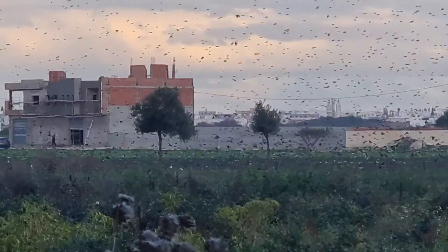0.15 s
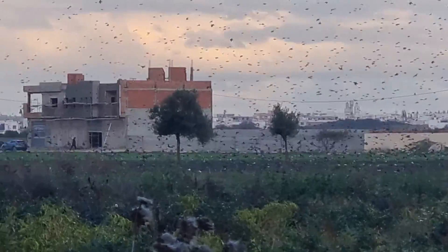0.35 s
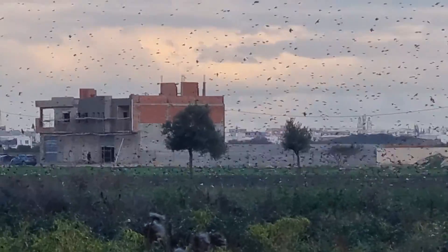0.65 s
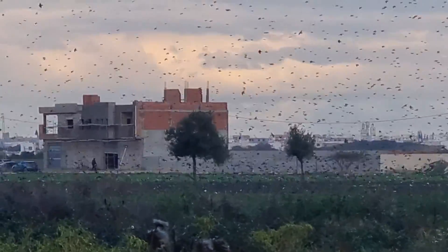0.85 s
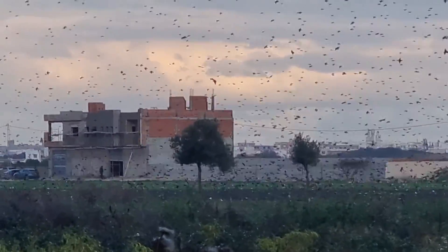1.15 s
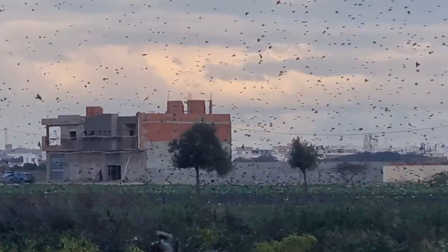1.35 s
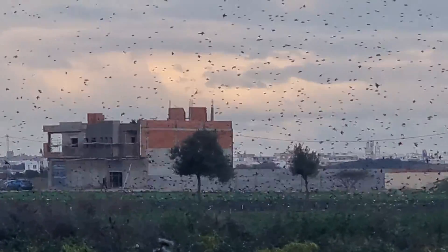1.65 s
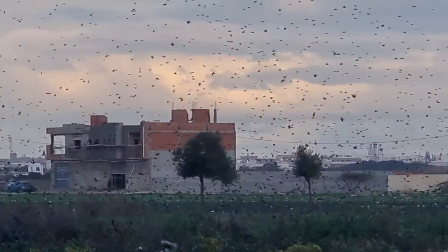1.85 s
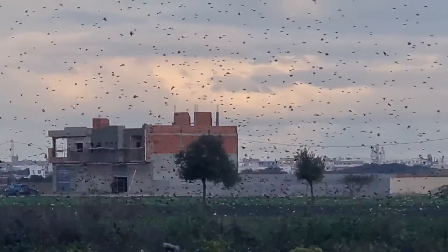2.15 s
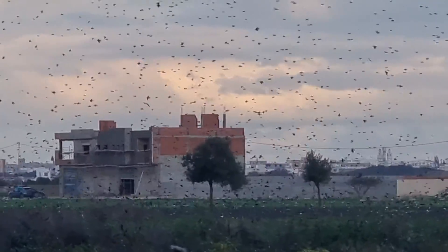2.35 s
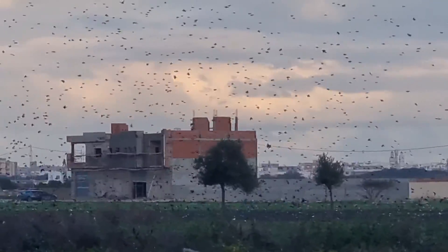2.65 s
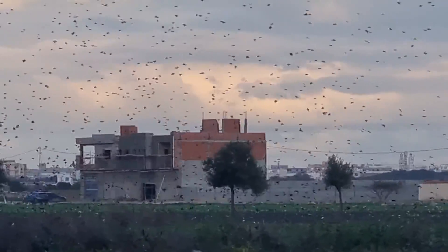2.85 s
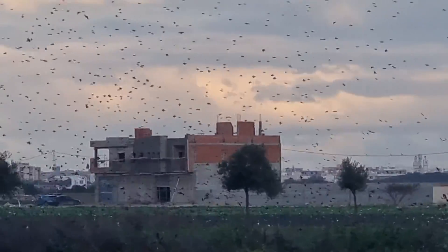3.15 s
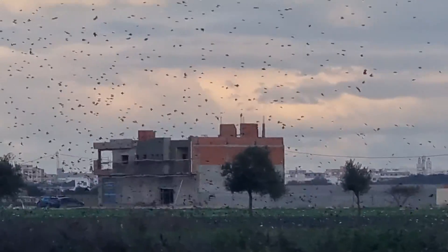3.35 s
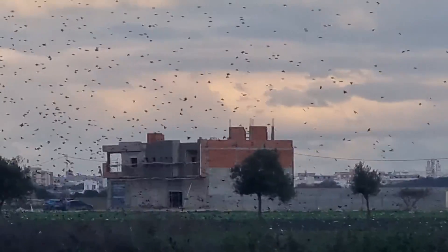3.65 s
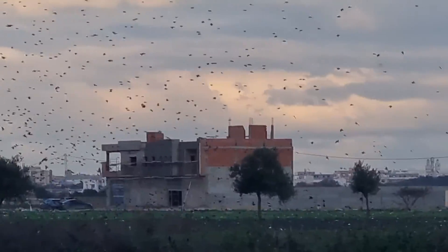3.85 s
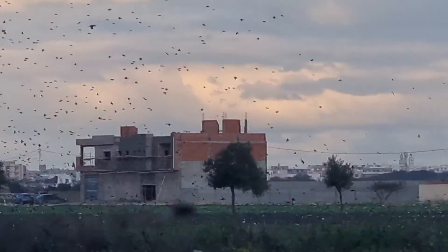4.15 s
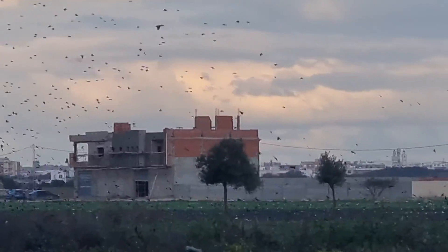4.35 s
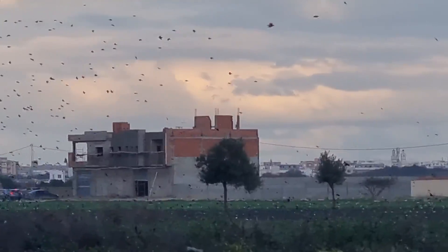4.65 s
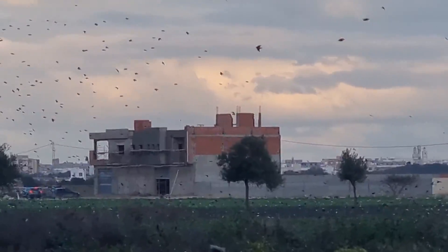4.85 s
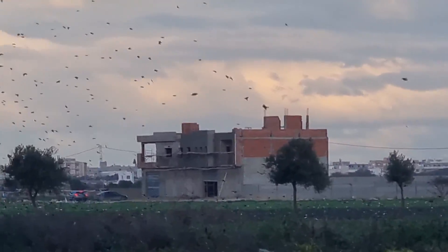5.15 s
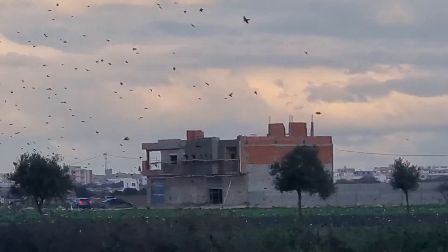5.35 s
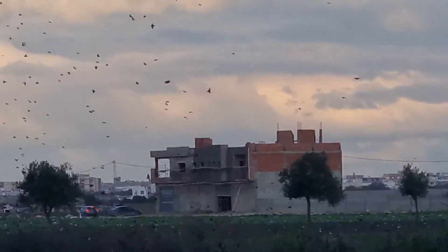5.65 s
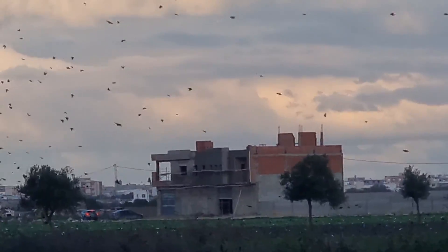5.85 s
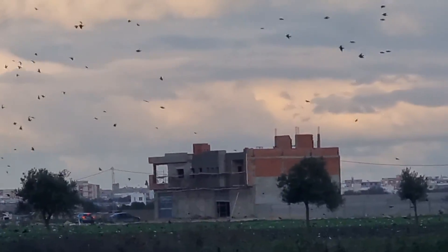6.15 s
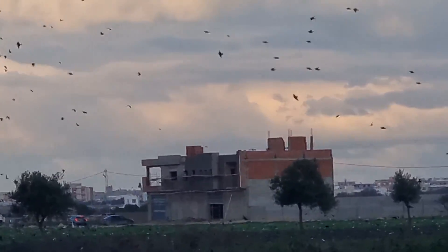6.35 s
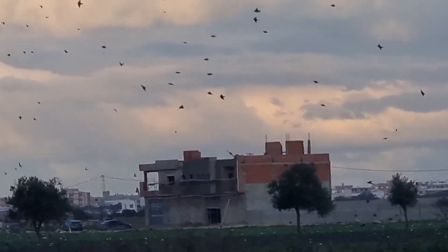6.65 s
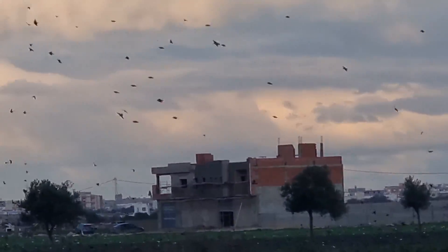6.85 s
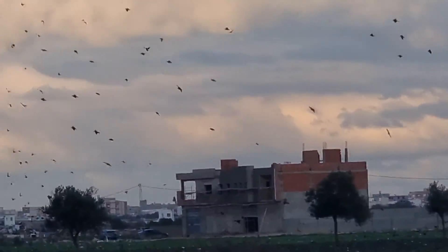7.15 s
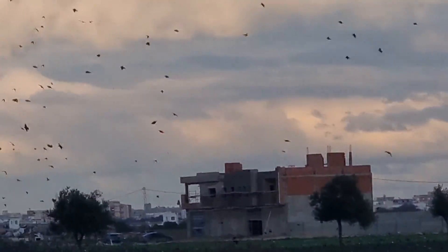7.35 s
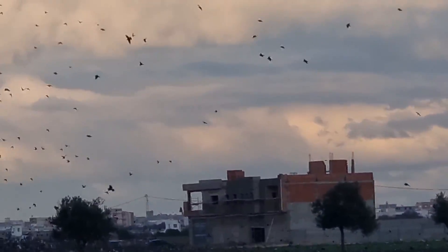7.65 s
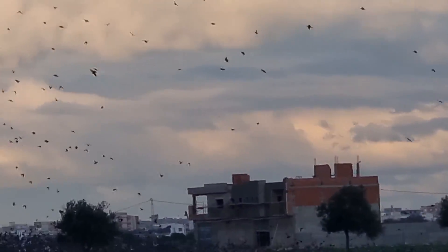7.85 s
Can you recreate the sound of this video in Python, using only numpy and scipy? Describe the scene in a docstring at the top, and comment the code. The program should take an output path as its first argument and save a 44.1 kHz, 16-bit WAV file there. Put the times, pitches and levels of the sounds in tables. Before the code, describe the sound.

Thousands of small birds twitter together across an open field, a few nearer chirps standing out, while far engines drone unevenly underneath.

```python
"""A huge starling flock over an open field: thousands of short falling chirps merge into a steady hiss of
chatter, while nearer calls, some built of several notes in a row, and thin whistles stand out.
Far traffic lies beneath: engines drone and throb as gliding sine notes, tyres swell and fade as bands
of shaped noise. Two spaced microphones hear the scene, with most of the flock to their left."""
import sys
import numpy as np
from scipy import signal
from scipy.fft import rfft, irfft, next_fast_len
from scipy.io import wavfile
from scipy.ndimage import uniform_filter1d, map_coordinates

SR = 44100
rng = np.random.default_rng(int(sys.argv[2]) if len(sys.argv) > 2 else 0)


def master(y):
    """Save y as 16-bit WAV."""
    cut = np.clip(np.atleast_2d(y).T, -1, 1)
    pcm = np.round(cut * 32767)  # scale
    wavfile.write(sys.argv[1], SR, pcm.astype(np.int16))


N = 353108

# loudness of the whole flock over time, before each layer's trim: time_s, level_db
CHATTER_LEVEL = [(0.1, -54.5), (1.36, -53), (2.95, -54.5), (4.92, -55), (5.55, -54.5), (7.9, -54.5)]
PORT_LAG_S = .0005  # sound from the left reaches the right microphone this much later


def amp(db):
    """Decibels to gain."""
    return 10 ** (np.asarray(db) / 20)


def unit(x):
    """Scale to rms 1."""
    return x / np.sqrt(np.mean(x ** 2) + 1e-20)


def along(points, hz):
    """Read (Hz, value) points on a log frequency axis."""
    point_hz, value = np.transpose(points)
    return np.interp(np.log(hz + 1), np.log(point_hz + 1), value)


def curves(rows):
    """One value per sample for each column after the time."""
    time_s, *columns = np.transpose(rows)
    return [np.interp(np.arange(N) / SR, time_s, column) for column in columns]


def bell(center_s, spread_s):
    """A smooth Gaussian hump of height 1 around a time."""
    t = np.arange(N) / SR
    return np.exp(-((t - center_s) / spread_s) ** 2 / 2)


def wobble(rate):
    """A smooth random curve, rate knots a second."""
    knots = rng.standard_normal(int(N * rate / SR) + 4)
    return map_coordinates(knots, [np.arange(N) * rate / SR])


def filtered(x, response):
    """Shape the spectrum of x by a response of frequency."""
    size = next_fast_len(N + SR // 4)
    hz = np.fft.rfftfreq(size, 1 / SR)
    return irfft(rfft(x, size) * response(hz), size)[..., :N]


def add(track, start, sound):
    """Mix a sound into a track from a sample on, cut at the track's ends."""
    lo, hi = max(start, 0), min(start + len(sound), N)
    if hi > lo:
        track[lo:hi] += sound[lo - start:hi - start]


def rush(spectrum, patchy_db, lag_s):
    """Outdoor stereo noise of rms 1 with drifting patches of gain; the right side is lag_s late."""
    # how alike the two ears are: pitch_hz, left_right_likeness (1 = identical)
    likeness = [(60, 0.79), (160, 0.98), (300, 0.77), (480, 0.65), (750, 0.55), (2000, 0.38), (4500, 0.12),
                (6500, 0.071)]
    grains = signal.stft(rng.standard_normal((2, N)), nperseg=1024)[2]
    patches = uniform_filter1d(rng.standard_normal(grains.shape[1:]), 7, 0)  # smooth over frequency
    patches = uniform_filter1d(patches, 16, 1)  # smooth over time
    pair = signal.istft(grains * amp(patchy_db * unit(patches)), nperseg=1024)[1][:, :N]

    def mid_side_response(hz):
        angle = np.arccos(np.clip(along(likeness, hz), -1, 1)) / 2
        return amp(along(spectrum, hz)) * [np.cos(angle), np.sin(angle)]

    mid, side = filtered(pair, mid_side_response)
    left, right = mid + side, mid - side
    return unit(np.array([left, np.roll(right, round(lag_s * SR))]))


def scatter(x, t60):
    """Ground, trees and walls return a short diffuse tail (60 dB down at t60 s), different at each ear."""
    t = np.arange(SR // 2) / SR
    tail = rng.standard_normal((2, len(t))) * amp(-60 * t / t60)
    return signal.fftconvolve(x, tail / np.linalg.norm(tail[0]), axes=1)[:, :N]


def firing_note(low_hz, top_hz, top_s, rev_s):
    """An engine's firing rate as a sine: it rises, eases off, and fades and wavers in the moving air."""
    fade_db, fade_rate, waver_rad = 2, 7, 0.43  # depth and knots a second of fading, phase drift
    hz = low_hz + (top_hz - low_hz) * bell(top_s, rev_s)
    phase = 2 * np.pi * (np.cumsum(hz) / SR + rng.random()) + waver_rad * wobble(9)
    return amp(fade_db * wobble(fade_rate)) * np.sqrt(2) * np.sin(phase)


def engines():
    """Only each engine's firing note carries this far; notes swell in passing and beat together."""
    # deepest engine, level before the drone trim: time_s, level_db
    heavy_level = [(0, -38), (.42, -46), (.65, -39.5), (1.0, -43.5), (1.15, -40.5), (1.55, -43),
                   (1.76, -46), (1.93, -40.5), (2.35, -40.5), (2.55, -43), (3.0, -49), (3.45, -37),
                   (3.85, -42.5), (4.25, -39), (4.62, -37.5), (4.8, -49.5), (5.7, -46), (8.0, -47.5)]
    # its note: low_hz, top_hz, top_s, rev_s (time spread of the rise)
    heavy_note = (50.7, 55.4, 5, 2.6)
    # other engines, before the trim: low_hz, top_hz, top_s, rev_s, nearest_s, half_passing_s, level_db
    far_engines = [ (74.1, 85.7, 5.6, 3.3, 3.5, 4.7, -50), (63, 64.2, 3.13, 1.932, 5, 2.1, -45.5),
                   (64, 72.5, 4.4, 2.9, 0.19, 1.1, -46.5), (72, 74, 4.01, 2.02, 2.6, 2.7, -51.5),
                   (82.6, 86, 7.7, 0.48, 6.8, 0.06, -42.5), (127.5, 151.5, 6.3, 3, 4.6, 2.1, -61)]
    # brief swells and dips of the whole drone: center_s, spread_s, gain_db
    throbs = [(0.005, 0.024, 6), (0.405, 0.024, 8.5), (.65, 0.037, -6), (1.125, 0.018, 4),
              (1.625, .015, 12.5), (1.737, .06, -19), (1.946, 0.019, 9), (2.29, .06, 2),
              (2.612, 0.019, -10), (3.17, 0.019, -10), (3.513, 0.017, 2.5), (4.27, 0.02, 5),
              (4.534, 0.017, 0.5), (4.63, .02, 5), (4.884, 0.016, 6.5), (5.05, .02, -6), (5.113, .018, 5.5),
              (5.627, .02, 5), (5.9, .025, 4.5), (6.2, 0.015, -8), (6.855, 0.027, 8.5)]
    drone_db, gust_db = -1.55, 0.5  # trim of all engines; how far gusts swing them
    t = np.arange(N) / SR
    heavy_db, = curves(heavy_level)
    drone = amp(heavy_db) * firing_note(*heavy_note)
    for *note, nearest_s, half_s, level_db in far_engines:
        distance = np.hypot(1, (t - nearest_s) / half_s)  # 1 when nearest
        drone += amp(level_db) / distance * firing_note(*note)
    throb_db = sum(gain_db * bell(center_s, spread_s) for center_s, spread_s, gain_db in throbs)
    return drone * amp(drone_db + gust_db * wobble(8) + throb_db)


def road():
    """Low traffic rumble and a wash of tyre noise, both shaped random noise."""
    # colour of the rumble: pitch_hz, relative_level_db (per Hz)
    rumble_colour = [(15, -25.5), (23, -26.5), (27, -10), (45, -1.5), (58, 0.5), (85, -2.5), (98, -7.5),
                     (125, -14), (165, -23), (300, -23.5), (500, -26), (1500, -75.5)]
    # colour of the tyre wash: pitch_hz, relative_level_db (per Hz)
    tyre_colour = [(200, -22), (400, -8.5), (480, -4.5), (550, 2.5), (680, -0.5), (880, 2), (1100, -4),
                   (1400, -3), (1700, -10.5), (2000, -4), (2400, -17.5), (4000, -10), (8000, -58.5)]
    # tyre wash before its trim: time_s, level_db
    tyre_level = [(0.1, -55.5), (0.8, -56.5), (2.0, -55), (3.98, -58.5), (4.65, -57.5), (5.1, -55),
                  (5.59, -58), (6.5, -56), (7.9, -54.5)]
    tyre_trim_db = 1
    tyre_db, = curves(tyre_level)
    rumble = amp(-46) * rush(rumble_colour, patchy_db=1.6, lag_s=0)
    wash = amp(tyre_db + tyre_trim_db) * rush(tyre_colour, patchy_db=1.27, lag_s=0)
    return rumble + wash


def passing_tyres():
    """Passing tyres sing in resonant bands of noise, each swelling and fading; one car may give several."""
    # bands of tyre noise from far cars, before the shared trim:
    # nearest_s, spread_s, tyre_pitch_hz, width_hz, level_db
    tyre_bands = [(1.5, 0.22, 1990, 200, -62), (1.45, .25, 1330, 198, -61.5),
                  (2.037, 0.15, 825, 160, -58.5), (2.43, 0.16, 882, 50, -57),
                  (2.056, 0.07, 1130, 130, -55.5), (2.4, 0.2, 362, 90, -60.5),
                  (3.174, 0.14, 1240, 480, -57), (3.56, 0.15, 292, 170, -60), (4.8, 0.3, 280, 170, -62),
                  (7.27, 0.25, 625, 200, -56.5), (7.6, 0.14, 874, 140, -65), (7.6, 0.32, 1420, 348, -64)]
    tread = rush([(100, 0), (3000, 0.002)], patchy_db=-0.5, lag_s=0)  # practically flat noise
    singing = np.zeros((2, N))
    for nearest_s, spread_s, pitch_hz, width_hz, level_db in tyre_bands:
        band = filtered(tread, lambda hz: 1 / (1 + ((hz - pitch_hz) / width_hz * 2) ** 2))
        singing += amp(level_db) * bell(nearest_s, spread_s) * unit(band)
    return amp(-2.0) * singing


def far_hiss():
    """The farthest wings and voices blur into a soft hiss that follows the flock's loudness."""
    # colour of the hiss: pitch_hz, relative_level_db (per Hz)
    hiss_colour = [(150, -9.5), (1000, -1.5), (1700, -0.5), (2000, 0.5), (2400, -3.5), (3000, 0), (4300, 1),
                   (5300, -0.5), (6000, -4.5), (7100, -8), (8400, -18), (9600, -38.5), (11000, -42.5),
                   (12500, -34.5)]
    hiss_trim_db = 2.22  # over the flock's level
    level_db, = curves(CHATTER_LEVEL)
    return amp(level_db + hiss_trim_db) * rush(hiss_colour, patchy_db=0.8, lag_s=PORT_LAG_S)


def chirp(length_s, top_hz, end_hz, rasp):
    """One note of rms 1: the pitch hooks up, falls and levels out, while the syrinx flutters."""
    u = np.linspace(0, 1, int(max(length_s, .01) * SR))  # progress through the note
    rise = u / .21  # 1 at the top of the hook
    hook = (rise * np.exp(1 - rise)) ** 2
    knots = np.linspace(0, 1, 40)
    flutter, tremor = rng.standard_normal((2, len(knots)))  # random pitch and loudness
    glide_hz = end_hz + (top_hz - end_hz) * hook
    hz = glide_hz * np.interp(u, knots, 1 + rasp * flutter)
    envelope = np.abs(np.sin(np.pi * knots ** .78)) ** .8
    swell = np.interp(u, knots, envelope * amp(2.3 * tremor))
    return unit(swell * np.sin(2 * np.pi * np.cumsum(hz) / SR))


def near_birds():
    """Nearer calls that stand out of the mass, some of several falling notes in a row, and thin whistles."""
    # notes of nearer calls, level before the trims: start_s, length_s, top_hz, end_hz, level_db
    near_notes = [ (0.387, .045, 4900, 3750, -52), (0.43, .05, 3500, 3080, -54),
                  (.675, .035, 7300, 5800, -61), (1.09, 0.06, 7780, 5950, -52),
                  (1.14, .062, 5300, 4950, -49.8), (1.183, 0.069, 4150, 3700, -55),
                  (1.228, .07, 7500, 6850, -62), (1.364, 0.046, 7700, 5200, -58),
                  (1.378, .045, 7800, 5500, -58), (1.666, 0.026, 5600, 5360, -54),
                  (1.70, 0.06, 4860, 4350, -56), (1.748, 0.04, 4150, 3910, -51),
                  (1.775, .065, 3450, 2950, -54), (1.845, .035, 7360, 5860, -58),
                  (2.198, 0.036, 4100, 3680, -55), (2.503, .045, 5480, 4440, -53),
                  (2.583, .06, 4000, 3440, -57.5), (2.73, .04, 4900, 4100, -58),
                  (2.8, 0.042, 6300, 5180, -56), (2.895, 0.035, 4850, 4300, -55),
                  (2.94, .05, 4400, 3670, -57), (3.24, .022, 7400, 5900, -57),
                  (3.347, 0.036, 3800, 3600, -56), (3.47, .05, 3870, 3600, -51),
                  (3.615, .035, 4900, 4450, -52.5), (3.818, .028, 7760, 6300, -59),
                  (4.083, 0.055, 3880, 3650, -54), (5.018, .06, 6400, 5250, -59),
                  (5.068, .04, 5400, 4850, -54), (5.358, .06, 6800, 5100, -58),
                  (5.481, .045, 4500, 4050, -57), (5.535, 0.032, 4450, 3850, -55),
                  (5.575, .035, 4500, 3950, -57), (5.713, 0.024, 6150, 5750, -59),
                  (5.711, 0.03, 4040, 3670, -53), (5.751, .035, 4200, 4000, -56),
                  (6.285, .035, 5400, 4880, -53), (6.32, .05, 3830, 3690, -51),
                  (6.39, 0.048, 2950, 2820, -59), (6.44, 0.064, 4150, 3820, -61),
                  (7.45, .055, 4100, 3720, -54)]
    # held notes, same columns: start_s, length_s, top_hz, end_hz, level_db
    whistles = [(4.21, .09, 8300, 8340, -75), (5.278, .04, 7080, 7020, -59),
                (5.345, 0.094, 7050, 7130, -62), (5.43, 0.14, 7020, 6900, -66)]
    trim_db, left_over_right_db, echo_db = -3, -1.5, -3
    ears = np.zeros((2, N))
    for start_s, length_s, top_hz, end_hz, level_db in near_notes + whistles:
        # low notes are harsh, high whistles are pure
        rasp = np.interp(top_hz, [4000, 5500, 7000], [.036, .016, .003])
        note = chirp(length_s, top_hz, end_hz, rasp)
        add(ears[0], round(start_s * SR), amp(level_db + left_over_right_db / 2) * note)
        add(ears[1], round((start_s + PORT_LAG_S) * SR), amp(level_db - left_over_right_db / 2) * note)
    return amp(trim_db) * (ears + amp(echo_db) * scatter(ears, t60=.25))


def flock(count=8000):
    """Thousands of randomly varied calls, each from its own distance and direction."""
    # colour of the distant chatter: pitch_hz, relative_level_db (per Hz)
    voice_colour = [(1500, -28.5), (2500, -6.5), (3200, -2), (3800, -4), (4500, -2), (5300, 1.5),
                    (6000, -9.5), (7100, -3.5), (7800, -9.5), (8600, -29), (9600, -35.5)]
    shortest_s, length_spread_s = 0.01905, .036  # shortest call, and how much longer they get
    least_fall, fall_spread = 0.0499, .28  # least fall and the most added, as shares of the end pitch
    voices_trim_db = 0.5  # over the flock's level
    ears = np.zeros((2, N))
    for turn, (when, area, bearing, length, pitch, fall) in enumerate(rng.random((count, 6))):
        end_hz = 2200 + 4900 * pitch
        top_hz = end_hz * (1 + least_fall + fall_spread * fall ** 2)
        call = chirp(shortest_s + length_spread_s * length, top_hz, end_hz, rasp=0.0099)
        # birds spread evenly over a wide ring of sky, none very close
        distance = np.sqrt(.22 + area)
        # most are far to the left and reach the right microphone later
        lag = round(PORT_LAG_S * SR * np.cos(np.pi * bearing ** 3))
        # calls follow one another evenly, from 0.1 s before the start
        start = int((turn + when) / count * (N + SR // 10)) - SR // 10
        add(ears[0], start, call / distance)
        add(ears[1], start + lag, call / distance)
    echo = amp(-5.5) * scatter(ears, t60=.3)
    mass = filtered(ears + echo, lambda hz: amp(along(voice_colour, hz)))
    level_db, = curves(CHATTER_LEVEL)
    return amp(level_db + voices_trim_db) * unit(mass)


def scene():
    """Birds above, traffic behind."""
    traffic = engines() + road() + passing_tyres()
    birds = far_hiss() + near_birds() + flock()
    return traffic + birds


def record(dry):
    """Each microphone has its own colour; nothing is kept above the band limit."""
    # how the microphones differ: pitch_hz, left_minus_right_db
    mic_tilt = [(60, -0.9), (160, -0.5), (300, -1.5), (650, -1.5), (900, -2.5), (1400, -3.5), (2000, -3),
                (2400, 2.5), (2900, 2.5), (3500, -0.5), (4400, -6.5), (5500, -1.5), (6000, -2),
                (7200, -5.5), (8200, -0.5)]
    top_hz = 15700  # band limit
    # half the difference goes to each side
    return filtered(dry, lambda hz: amp(np.outer([.5, -.5], along(mic_tilt, hz))) * (hz < top_hz))


dry = scene()
out = record(dry)
master(out)
```